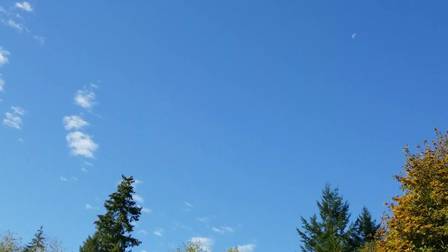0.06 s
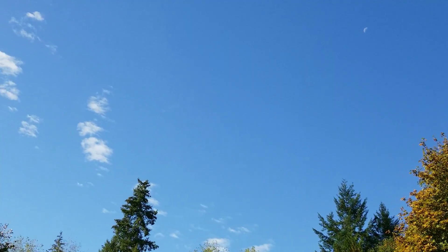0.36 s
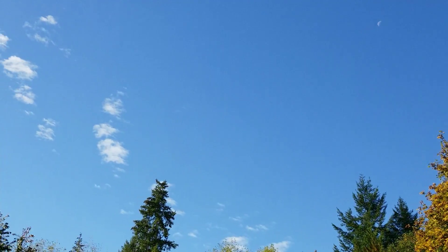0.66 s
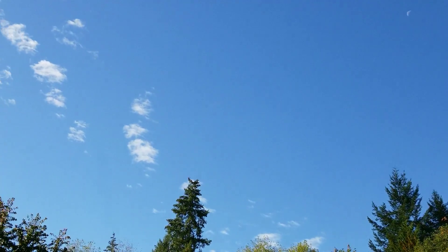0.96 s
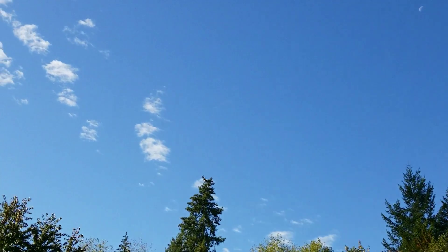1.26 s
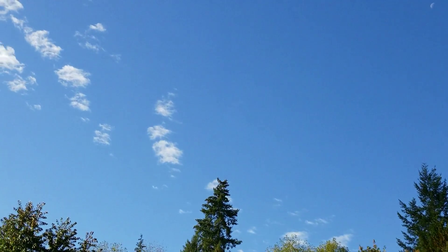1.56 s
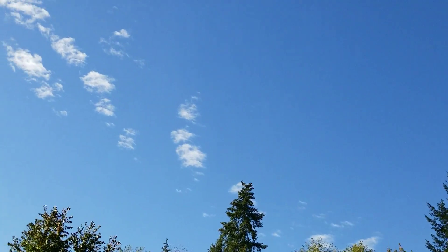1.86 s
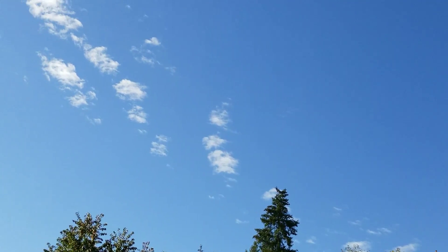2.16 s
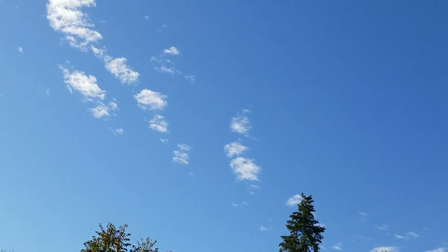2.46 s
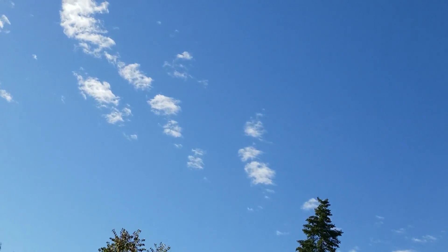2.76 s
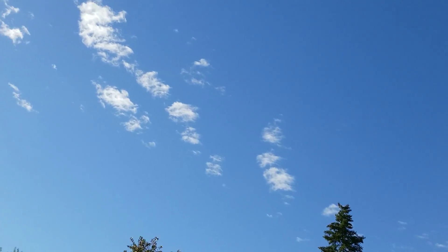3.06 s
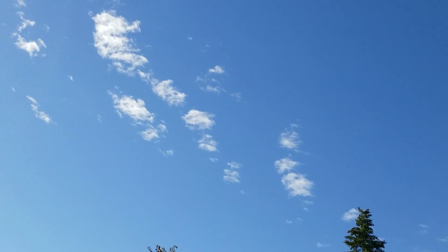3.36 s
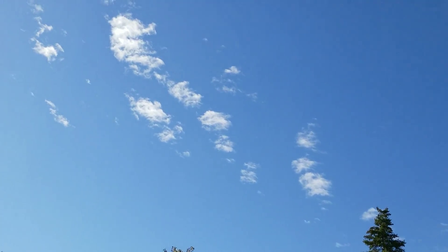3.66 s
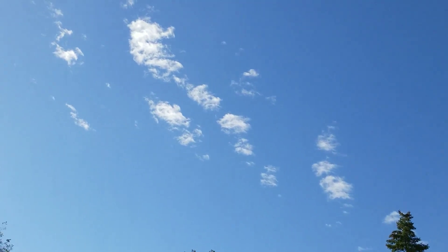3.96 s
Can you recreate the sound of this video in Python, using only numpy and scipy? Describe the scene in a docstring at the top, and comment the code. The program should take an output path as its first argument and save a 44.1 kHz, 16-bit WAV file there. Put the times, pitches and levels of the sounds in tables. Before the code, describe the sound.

Wind blows through treetops, with a low, fluttering rumble shifting between the microphone's left and right sides. A leafy hiss swells from about 0.5 to 1.3 seconds and holds. A distant bird whistles one faint, high note near 0.7 seconds and three quick ones around 2 seconds. At 3 seconds a hard, loud gust buffets the microphone; the hiss drops and uneven rumbling continues until 4 seconds.

```python
"""Wind in the treetops

A leafy hiss swells and holds steady, heard on a hand-held stereo microphone. Swirls of air rumble
on its left and right openings separately. At 3 s a hard gust hits them and drives the limiter.
After the gust the hiss is turned down and stays quieter. Far away, a small bird whistles thinly."""
import sys
import numpy as np
from scipy import signal
from scipy.fft import rfft, irfft
from scipy.io import wavfile
from scipy.ndimage import uniform_filter1d, minimum_filter1d, map_coordinates

SR = 44100
rng = np.random.default_rng(int(sys.argv[2]) if len(sys.argv) > 2 else 0)


def inscribe(sig):
    """Save sig as 16-bit PCM at rate SR to the path in sys.argv[1].

    A 1-D sig is mono; a 2-D sig holds one channel per row.
    Samples are clipped to [-1, 1] before scaling.
    """
    pcm = np.round(np.clip(np.atleast_2d(sig).T, -1, 1) * 32767)
    wavfile.write(sys.argv[1], SR, pcm.astype(np.int16))


N = 4 * SR


def gain(db):
    """Turn decibels into a number to multiply by."""
    return 10 ** (np.asarray(db) / 20)


def curve(rows):
    """Join (time [s], value) points with straight lines."""
    return np.interp(np.arange(N) / SR, *np.array(rows).T)


def wander(hz):
    """Drift smoothly by about 1 either way, with hz random steps a second."""
    hold = max(int(SR / hz), 2)
    steps = rng.standard_normal(4096)[np.arange(N) // hold % 4096]
    return 1.3 * uniform_filter1d(uniform_filter1d(steps, hold), hold)


def noise(tone, size):
    """Noise of strength 1, shaped by (frequency [Hz], relative level [dB]) points."""
    hz, db = np.array(tone).T
    freqs = np.maximum(np.fft.rfftfreq(size, 1 / SR), 1)
    shape = gain(np.interp(np.log(freqs), np.log(hz), db))
    shaped = irfft(rfft(rng.standard_normal(size)) * shape, size)
    return shaped / shaped.std()


# how the rumble swells at each opening (time [s], level [dB])
LEFT_RUMBLE = [(0, -29.5), (.3, -29.5), (.59, -26.5), (.625, -18.5), (.68, -25.5), (.78, -28), (.91, -37),
               (1.03, -28), (1.17, -34), (1.21, -26), (1.29, -33.5), (1.54, -39.5), (1.6, -31),
               (2.26, -23.5), (2.46, -26.5), (2.5, -17), (2.56, -29.5), (2.6, -21.5), (2.68, -39),
               (2.95, -40), (3.025, -7), (3.19, -8.5), (3.265, -24), (3.3, -14), (3.355, -24), (3.44, -22),
               (3.48, -28), (3.52, -20.5), (3.72, -22), (3.82, -29.5), (3.88, -23), (4, -26.5)]
RIGHT_RUMBLE = [(0, -33.5), (0.039, -26), (0.222, -29.5), (0.329, -44), (0.371, -29), (.61, -39.5),
                (.74, -24), (.78, -36), (.93, -31.5), (1.15, -45.5), (1.84, -41), (1.889, -25.5),
                (1.95, -40), (2.28, -23), (2.449, -17.5), (2.511, -26), (2.54, -20.5), (2.66, -37),
                (2.689, -27), (2.9, -33), (2.976, -27), (3.0, -4.5), (3.019, -7.5), (3.05, -27.5),
                (3.13, -20), (3.231, -18.5), (3.321, -27.5), (3.67, -32.5), (3.719, -27), (4, -21.5)]
# how fast the air passes, before swells and thumps (time [s], relative speed [x])
AIR_FLOW = [(0, 0.99), (.45, 1), (.65, 0.86), (2.3, 0.95), (2.9, 0.77), (3.13, 1.5), (3.3, 1.22),
            (3.55, 1.417), (4, 1.6)]
# single hard swirls (time [s], left boost [dB], right boost [dB], speed rise [octaves])
THUMPS = [(0.039, 3, 9, 0.39), (0.083, 5, 7.5, 0.25), (.347, 12, -9, 0.12), (.385, 8.5, 1, 0.25),
          (0.457, 9, 8.5, 0.24), (0.544, 13, -4, 0.32), (0.771, 10, 0, 0.23), (1.206, 10.5, -4, 0.46),
          (1.26, 5, 5, 0.17), (1.736, 7, 8, 0.5), (2.121, 3, 3, 0.075), (2.425, 6.5, 4, 0.028),
          (2.78, 10, 1, 0.55), (3.012, 2, 3, .15), (3.046, 8, 8, .8), (3.179, 2, -9, .3),
          (3.222, -5, 4.5, 0.0039), (3.287, 2, 3, 0.19), (3.374, 10.5, 0.5, 1.145), (3.444, 5, 0.5, 0.24),
          (3.607, 2.5, 0, 0.12), (3.665, 0, -5, 0.62), (3.708, 6, -9, 0.83), (3.75, 3, 2, .5),
          (3.994, -1, 1.5, 0.69)]
# tone of the swirls at speed 1 (frequency [Hz], relative level [dB])
SWIRL_TONE = [(10, -17.5), (40, -1), (65, 1), (110, 0), (200, -6.5), (300, -16), (450, -29.5), (700, -42),
              (1400, -63), (4000, -90)]
def wind_rumble(levels, side):
    """Swirls of air push on one opening (0 left, 1 right): faster air sounds louder and higher."""
    flutter_db, flutter_octaves = 2.14, .11
    thump_width_s, db_per_octave = .007, 45
    bass_cut_hz, bass_leak = 36.8, .037
    t = np.arange(N) / SR
    swell, flutter = curve(levels), wander(hz=109.6)
    db = swell + flutter_db * flutter
    octaves = (swell + 26) / db_per_octave + flutter_octaves * flutter
    for at, left_db, right_db, rise in THUMPS:
        thump = np.exp(-.5 * ((t - at) / thump_width_s) ** 2)
        db += (left_db, right_db)[side] * thump
        octaves += rise * thump
    # faster air runs through the same swirls sooner, raising their pitch
    travelled = np.cumsum(curve(AIR_FLOW) * 2 ** octaves)
    swirls = noise(SWIRL_TONE, size=2 * N)
    pressure = map_coordinates(swirls, [travelled], mode="wrap") * gain(db)
    bass_cut = signal.butter(2, bass_cut_hz, "high", fs=SR, output="sos")
    trimmed = signal.sosfilt(bass_cut, pressure)
    return trimmed + bass_leak * (pressure - trimmed)


# the hiss swells, holds, then is turned down after the gust at 3 s (time [s], level [dB])
HISS_LEVEL = [(0, -43.5), (.48, -42), (.75, -37), (1.0, -35.3), (1.22, -34.5), (1.265, -32), (1.3, -34.5),
              (2.1, -33.5), (3.015, -34), (3.035, -42.5), (3.06, -38), (3.075, -37.5), (3.35, -43.5),
              (3.8, -45.5), (4, -46)]
# tone of the hiss on each side (frequency [Hz], relative level [dB])
LEFT_HISS_TONE = [(40, 8), (200, 8), (450, 3), (750, 1.3), (1400, -0.4), (2200, -1), (3300, -3.5),
                  (5000, -4.5), (7000, -10.5), (9500, -17), (12500, -13), (15500, -16.5)]
RIGHT_HISS_TONE = [(40, 3), (200, -0.5), (450, -4), (750, -5.5), (1400, -8.5), (2200, -7.5), (3300, -10),
                   (5200, -11.5), (6900, -20), (8000, -16), (9700, -22), (12500, -16), (15500, -22.5)]
# how bright the hiss is (time [s], tilt around 2 kHz [dB per octave])
HISS_BRIGHTNESS = [(0, -0.8), (.6, -0.54), (1.3, 0.42), (3, 0.47), (4, 0.3)]
def leaf_hiss():
    """Countless distant leaves blend into a wide, flickering hiss that brightens as it swells."""
    right_db, flicker_db = -3, .8
    left = noise(LEFT_HISS_TONE, size=N)
    right = gain(right_db) * noise(RIGHT_HISS_TONE, size=N)
    spectrum = rfft(np.array([left, right]))
    freqs = np.clip(np.fft.rfftfreq(N, 1 / SR), 250, 16000)
    octaves = np.log2(freqs / 2000)
    level, brightness = curve(HISS_LEVEL), curve(HISS_BRIGHTNESS)
    hiss = 0
    for centre in range(-3, 4):  # seven bands an octave apart, each with its own flicker
        band = irfft(spectrum * np.maximum(1 - abs(octaves - centre), 0), N)
        hiss += band * gain(level + centre * brightness + flicker_db * wander(hz=20))
    return hiss


# the bird's notes (start time [s], length [s], level [dB])
BIRD_NOTES = [(.685, 0.09, -55), (1.984, 0.091, -48.5), (2.099, 0.097, -52), (2.19, 0.074, -52.5)]
def bird_whistles():
    """A small bird whistles thin notes on one slightly wavering pitch, each fading in and out."""
    pitch_hz, waver = 6274, .00126
    t = np.arange(N) / SR
    loudness = 0
    for at, length, db in BIRD_NOTES:
        progress = np.clip((t - at) / length, 0, 1)
        loudness += gain(db) * np.sin(np.pi * progress)
    hz = pitch_hz * (1 + waver * wander(hz=60))
    return loudness * np.sin(2 * np.pi * np.cumsum(hz) / SR)


def scene():
    """Wind on the microphone, with leaves and a bird in the distance."""
    rumble = np.array([wind_rumble(LEFT_RUMBLE, side=0), wind_rumble(RIGHT_RUMBLE, side=1)])
    return rumble + leaf_hiss() + bird_whistles()


def record(dry):
    """A fast limiter turns both sides down on the loudest peaks; the highest treble is cut."""
    limit, recovery_s, top_hz = .96, .025, 15550
    excess = np.log(np.maximum(abs(dry).max(axis=0) / limit, 1))
    held = -minimum_filter1d(-excess, size=129)  # largest excess within about 3 ms
    fade = np.exp(-np.arange(N) / SR / recovery_s)
    easing_off = np.maximum.accumulate(held / fade) * fade  # let go gradually after each peak
    turn_down = uniform_filter1d(easing_off, size=129)
    treble_cut = signal.ellip(10, .1, 80, top_hz, fs=SR, output="sos")
    return signal.sosfilt(treble_cut, dry * np.exp(-turn_down))


dry = scene()
out = record(dry)
inscribe(out)
```